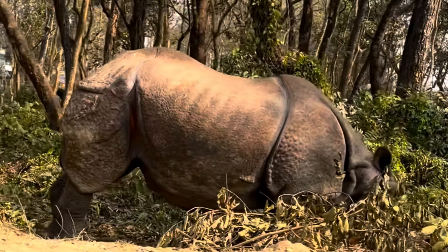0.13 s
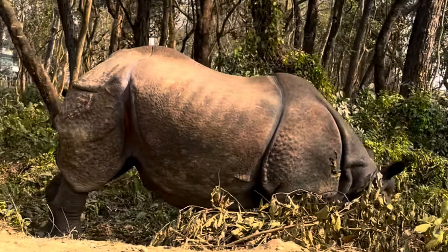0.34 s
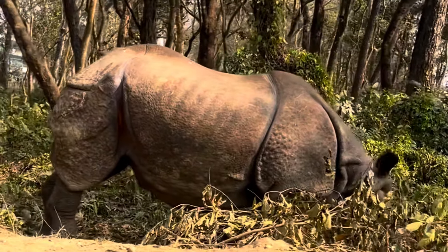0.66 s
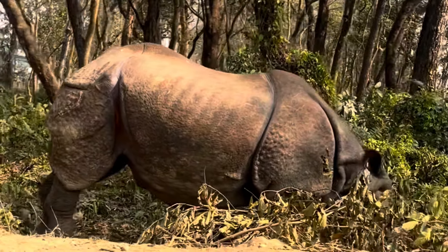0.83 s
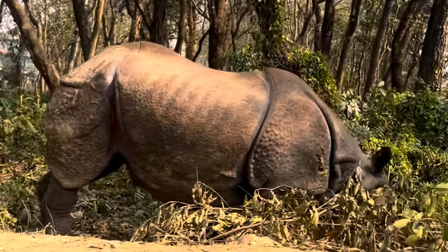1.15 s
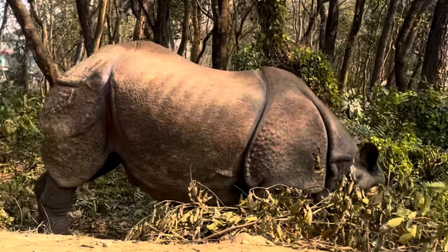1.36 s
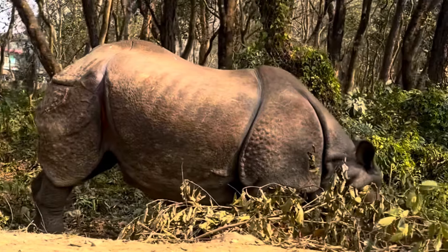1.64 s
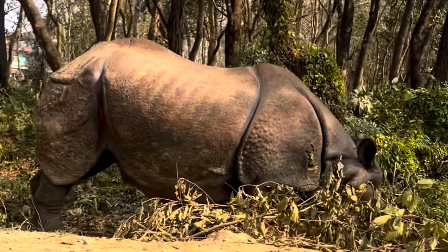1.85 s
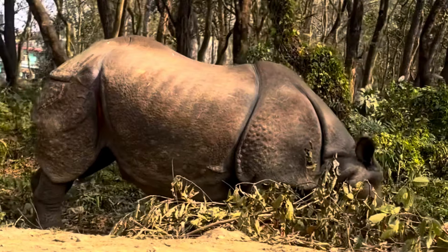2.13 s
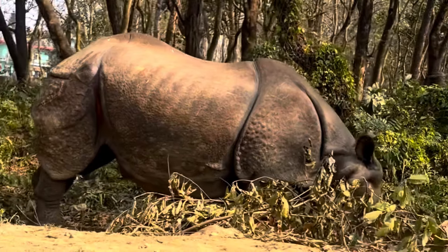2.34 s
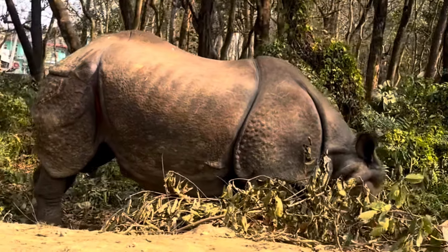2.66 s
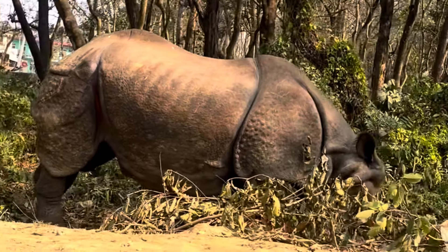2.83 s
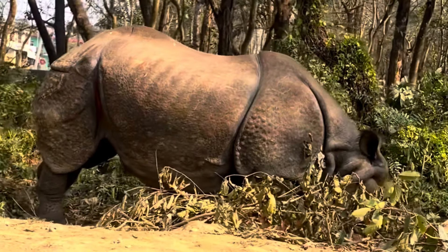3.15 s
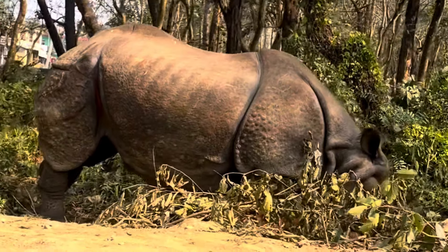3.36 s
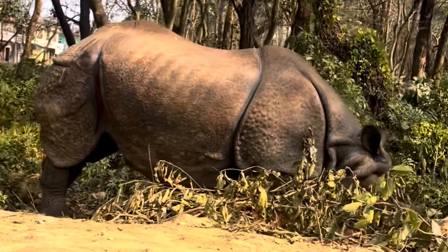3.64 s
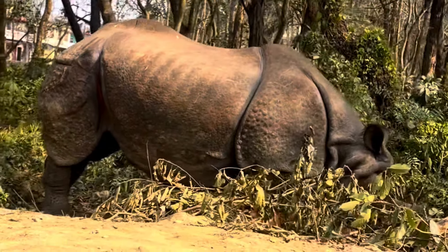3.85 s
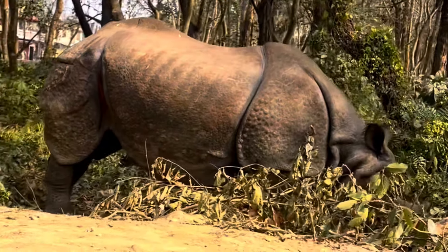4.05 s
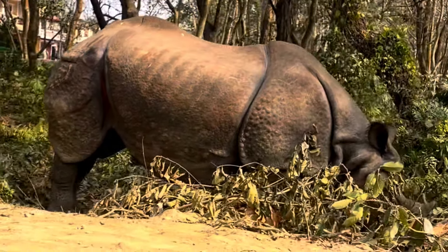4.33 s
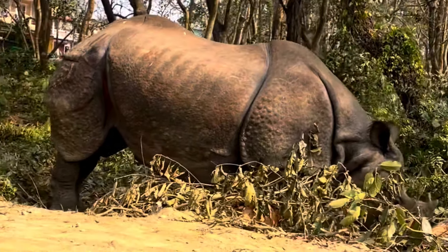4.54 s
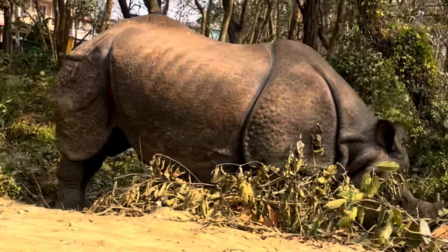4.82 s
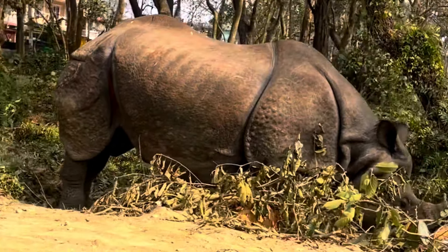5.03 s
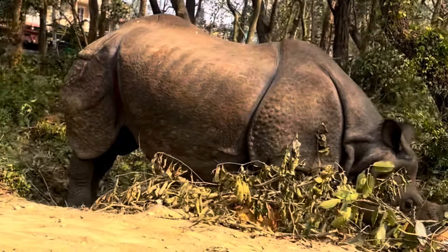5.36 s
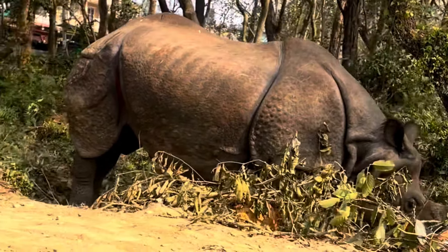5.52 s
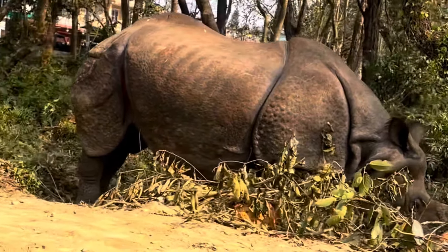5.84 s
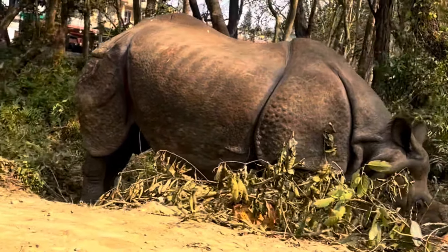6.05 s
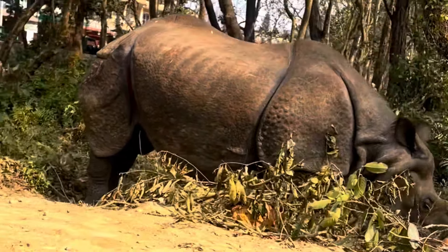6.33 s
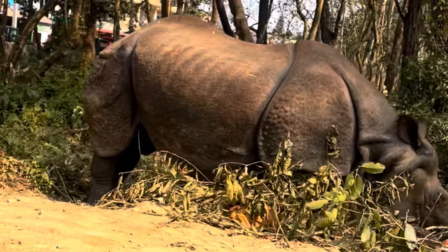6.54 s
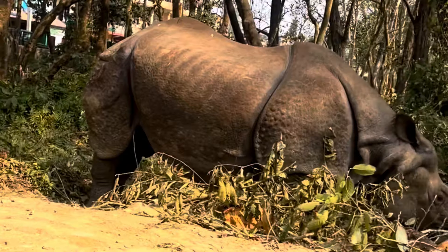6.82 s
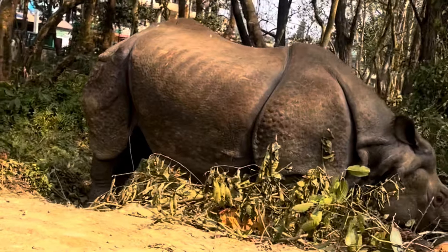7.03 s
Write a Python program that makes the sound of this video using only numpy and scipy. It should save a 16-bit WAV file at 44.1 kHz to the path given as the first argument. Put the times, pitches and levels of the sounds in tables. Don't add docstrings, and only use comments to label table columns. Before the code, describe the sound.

A steady, soft hiss of a far brook with small ringing gurgles runs throughout, above a deep rumble of slow air that swells slightly near 1.5 and 4.7 s. Soft dry twig cracks tick at 1.0 and 2.2 s. From 2.4 to 4 s a high bird behind leaves warbles, plunges in pitch and ends in a rough buzz, mostly echo; a short chatter cuts in at 2.7 s and cattle low very faintly far left at 2.8-3.6 s. From 4.7 s a distant piper holds notes, joined after 5.4 s by thin, very high shaking whistles and low fluting on the left. Twigs snap sharply at 5.2 and 5.8 s. At 6.35-7 s a near bird pours out loud, quick slurs and trills, with another crack left at 6.8 s, then a shrill left-hand bird shakes upward around 7 s. Wide stereo, woodland echoes, muted treble.

```python
import sys
import numpy as np
from scipy import signal
from scipy.fft import rfft, irfft
from scipy.io import wavfile
from scipy.ndimage import uniform_filter1d, map_coordinates

SR = 44100
rng = np.random.default_rng(int(sys.argv[2]) if len(sys.argv) > 2 else 0)


def voltage_ratio(decibels):
    exponent = np.asarray(decibels, float) / 20
    return 10 ** exponent


def store_wav(level_fs):
    pcm = np.round(np.clip(np.atleast_2d(level_fs), -1, 1) * 32767)
    wavfile.write(sys.argv[1], SR, pcm.T.astype(np.int16))


N = 316638


def unit(x):
    return x / np.sqrt(np.mean(x ** 2) + 1e-20)


def along(points, hz):
    f, v = np.transpose(points)
    return np.interp(np.log(hz + 1), np.log(f + 1), v)


def wobble(rate, count=N):
    return map_coordinates(rng.standard_normal(N // 100), [np.arange(count) * rate / SR])


def slur(u, length, bend=0.94):
    return u ** bend


def hook(settle_s):
    return lambda u, length: 1 - np.exp(-u * length / settle_s)


def arch(u, length):
    return np.sin(np.pi * u)


def phrase(rows, law, peak_at, rise_db, fall_db, depth_hz=0., grow_s=0.0091):
    u = np.linspace(0, 1, 41)
    swell = np.interp(u, [0, np.clip(peak_at, .05, .95), 1], [-rise_db, 0, -fall_db])
    notes = []
    for s, length, first, last, db in rows:
        hz = first + (last - first) * law(u, length)
        depth = depth_hz * (1 - np.exp(-u * length / grow_s))
        notes.append(np.transpose([s + u * length, hz, db + swell, depth]))
    return notes


def song(notes, warble_hz=48.3, rough_db=0.5, edge=0.003, dip_db=9.0):
    out = np.zeros(N + SR)
    for note in notes:
        s, hz, db, depth = np.transpose(note)
        t = np.arange(s[0], s[-1], 1 / SR)
        shake = np.sin(2 * np.pi * warble_hz * t + 0.874 * wobble(25, count=len(t)))
        wide = np.interp(t, s, depth)
        swing = wide * (shake + 0.28 * shake ** 2)
        phase = 2 * np.pi * np.cumsum(np.interp(t, s, hz) + swing) / SR
        to_edge = np.minimum(t - s[0], s[-1] - t)
        fade = np.sin(np.pi / 2 * np.clip(to_edge / edge, 0, 1)) ** 2
        rough = rough_db * wobble(74, count=len(t))
        dip = dip_db * shake ** 2 * np.tanh(wide / 120)
        level = voltage_ratio(np.interp(t, s, db) + rough - dip)
        out[round(s[0] * SR):][:len(t)] += np.sqrt(2) * level * fade * np.sin(phase)
    return out[:N]


def placed(x, pan_db, lag, direct_db, echo_db, decay=1., near_db=4.0):
    # (frequency [Hz], time to fall 60 dB [s])
    wood = [(200, 0.15), (3500, 1.03), (7000, 0.87), (10000, 0.52)]
    build_s = 0.027
    hz, t, z = signal.stft(rng.standard_normal((2, SR * 3 // 2)), SR, nperseg=256)
    fall = voltage_ratio(-60 * t / decay / along(wood, hz)[:, None])
    far = signal.istft(z * (1 - np.exp(-t / build_s)) * fall, SR, nperseg=256)[1]
    near = rng.standard_normal(far.shape) * voltage_ratio(-60 * np.arange(far.shape[1]) / SR / .12)
    trunks = voltage_ratio(echo_db) * far / np.linalg.norm(far[0])
    branches = voltage_ratio(near_db) * near / np.linalg.norm(near[0])
    direct = np.array([np.roll(x, round(lag / 2)), np.roll(x, -round(lag / 2))])
    start = np.flatnonzero(x)[0]
    wet = signal.oaconvolve(x[None, start:], trunks + branches, axes=1)
    wet = np.pad(wet, [(0, 0), (start, 0)])[:, :N]
    return (voltage_ratio(direct_db) * direct + wet) * voltage_ratio([[pan_db / 2], [-pan_db / 2]])


def near_singer():
    # (start [s], length [s], first pitch [Hz], last pitch [Hz], peak [dB])
    quick = [(6.352, 0.02, 4840, 4230, -39.5), (6.374, 0.022, 4120, 3820, -43),
             (6.385, 0.021, 4950, 4770, -44.5), (6.401, 0.023, 4120, 3740, -35),
             (6.42, 0.013, 3800, 2940, -43.5), (6.443, 0.031, 4020, 4030, -52),
             (6.445, .035, 2550, 2500, -53), (6.465, .04, 2916, 3080, -51), (6.469, .02, 4050, 4050, -48),
             (6.482, 0.031, 3300, 4026, -31), (6.521, 0.017, 5050, 4250, -41.5),
             (6.532, 0.021, 4217, 3584, -32.5), (6.535, 0.02, 3040, 3000, -50.5),
             (6.59, .04, 3020, 3050, -57), (6.611, 0.012, 4190, 4010, -39), (6.621, .018, 4004, 3724, -32),
             (6.636, .016, 3600, 3430, -42), (6.676, 0.011, 4170, 3950, -44),
             (6.715, 0.033, 4270, 4180, -44.5), (6.74, 0.041, 3530, 3030, -46),
             (6.825, 0.064, 4040, 4260, -48.5), (6.862, .05, 2600, 3390, -51),
             (6.925, 0.018, 4180, 4440, -61), (6.93, 0.041, 3250, 2620, -50.5)]
    trill = [
        (6.662, 0.046, 4870, 4840, -45.5),
        (6.755, .032, 4800, 4920, -51),
        (6.805, 0.044, 4570, 4390, -43.5),
        (6.94, 0.067, 3470, 3480, -49.5),
    ]
    notes = (phrase(quick, slur, peak_at=.55, rise_db=10, fall_db=17)
             + phrase(trill, slur, peak_at=.15, rise_db=4, fall_db=8, depth_hz=119))
    return placed(song(notes), pan_db=2.5, lag=-45.0, direct_db=0.5, near_db=-12, echo_db=-3.5, decay=1.06)


def seeter():
    # (start [s], length [s], first pitch [Hz], last pitch [Hz], peak [dB])
    high = [
        (2.37, 0.044, 8020, 9000, -57),
        (2.405, 0.053, 8170, 7900, -50.5),
        (2.445, 0.047, 7750, 7150, -47),
        (2.49, 0.08, 7330, 6900, -52),
        (2.53, 0.032, 8250, 8150, -65),
        (2.89, 0.072, 8520, 8200, -58),
        (2.95, .1, 7425, 7150, -48.5),
        (3.04, 0.11, 6380, 6300, -55),
        (3.11, 0.19, 6930, 6900, -52.5),
    ]
    plunge = [
        (3.315, .066, 6720, 3500, -49),
    ]
    landing = [
        (3.378, .155, 3884, 4060, -47.5),
        (3.85, .19, 3480, 3415, -59.5),
    ]
    buzz = [
        (3.53, .33, 3954, 3853, -45.5),
    ]
    notes = (phrase(high, slur, peak_at=0.23, rise_db=1.5, fall_db=5, depth_hz=209)
             + phrase(plunge, lambda u, length: slur(u, length, bend=1.6),
                      peak_at=0.43, rise_db=0.5, fall_db=-8.0, depth_hz=135)
             + phrase(landing, slur, peak_at=0.12, rise_db=-1.0, fall_db=5, depth_hz=276))
    rasp = phrase(buzz, slur, peak_at=0.38, rise_db=2.0, fall_db=7, depth_hz=802, grow_s=0.0145)
    voice = song(notes, warble_hz=36.5, dip_db=12.5) + song(rasp, warble_hz=32.9, rough_db=5.5, dip_db=16)
    return placed(voice, pan_db=-3.5, lag=8, direct_db=-5, near_db=2.5, echo_db=1.0, decay=0.88)


def chatterer():
    # (start [s], length [s], first pitch [Hz], last pitch [Hz], peak [dB])
    chatter = [
        (2.722, 0.021, 4360, 4470, -62),
        (2.745, 0.024, 4040, 3940, -50.5),
        (2.755, 0.017, 5080, 5080, -53.5),
        (2.772, 0.022, 4380, 3860, -51),
        (2.792, 0.013, 3650, 3280, -50),
        (2.81, 0.021, 4100, 4120, -59),
    ]
    notes = phrase(chatter, slur, peak_at=0.33, rise_db=7.0, fall_db=8)
    return placed(song(notes), pan_db=-4.5, lag=8, direct_db=-0.5, near_db=4, echo_db=0.5, decay=1.1)


def shriller():
    # (start [s], length [s], first pitch [Hz], last pitch [Hz], peak [dB])
    shrill = [
        (6.978, 0.09, 5780, 7260, -49.5),
    ]
    ending = [
        (7.14, 0.037, 5680, 6434, -49),
    ]
    snap = hook(settle_s=.005)
    notes = (phrase(shrill, snap, peak_at=.4, rise_db=-0.5, fall_db=2.5, depth_hz=420, grow_s=0.018)
             + phrase(ending, snap, peak_at=0.44, rise_db=5, fall_db=-3.5))
    voice = song(notes, warble_hz=68.5, dip_db=-1.5)
    return placed(voice, pan_db=5, lag=-45, direct_db=1, echo_db=-1.2, decay=0.97)


def fluter():
    # (start [s], length [s], first pitch [Hz], top pitch [Hz], peak [dB])
    arched = [
        (5.778, .039, 2330, 2353, -59),
        (5.865, 0.047, 2330, 2492, -54),
        (6.0, 0.064, 2230, 2270, -62.5),
        (7.128, 0.051, 2650, 2710, -54.5),
    ]
    crest = [
        (6.195, .08, 2670, 3018, -51),
    ]
    lead = [
        (6.105, .092, 2310, 2700, -58.5),
        (6.29, 0.11, 3150, 3070, -65),
    ]
    notes = (phrase(arched, arch, peak_at=.55, rise_db=5.5, fall_db=5)
             + phrase(crest, arch, peak_at=0.79, rise_db=2.5, fall_db=-1.0)
             + phrase(lead, lambda u, length: slur(u, length, bend=1.1),
                      peak_at=0.71, rise_db=4, fall_db=-1.0))
    return placed(song(notes), pan_db=10.5, lag=-42, direct_db=1.0, near_db=-7, echo_db=-7, decay=.9)


def piper():
    # (start [s], length [s], first pitch [Hz], last pitch [Hz], peak [dB])
    hooked = [
        (5.387, 0.13, 5950, 5120, -60),
        (6.073, .127, 6100, 5200, -59.5),
    ]
    held = [
        (4.722, 0.25, 3545, 3415, -57.5),
        (5.04, 0.14, 4450, 4430, -61.5),
        (5.74, 0.13, 4430, 4420, -59),
    ]
    quick = [
        (4.698, 0.034, 2800, 3610, -60.5),
        (5.19, .05, 3900, 4400, -69.5),
        (5.425, 0.015, 5050, 4840, -59),
        (5.445, .032, 4150, 3720, -60),
        (5.855, 0.021, 4850, 4630, -61),
        (6.118, 0.021, 5200, 3590, -52.5),
        (6.146, 0.02, 3640, 3670, -58.5),
    ]
    notes = (phrase(hooked, hook(settle_s=.007), peak_at=0.067, rise_db=1.5, fall_db=10, depth_hz=45)
             + phrase(held, slur, peak_at=.15, rise_db=1.5, fall_db=12, depth_hz=48.3)
             + phrase(quick, slur, peak_at=0.46, rise_db=3.0, fall_db=-1.5))
    voice = song(notes, rough_db=3.5, dip_db=8, warble_hz=26.7)
    return placed(voice, pan_db=5, lag=-39, direct_db=-5.0, near_db=2.5, echo_db=-4.5, decay=1.0)


def thin_singer():
    # (start [s], length [s], first pitch [Hz], last pitch [Hz], peak [dB])
    opening = [
        (5.39, 0.16, 9000, 8520, -62),
    ]
    long_notes = [
        (5.59, 0.25, 8610, 8430, -63.5),
        (5.76, 0.19, 8600, 8290, -62),
        (5.94, .17, 8430, 8390, -63),
        (6.138, 0.21, 8270, 8420, -54.5),
    ]
    notes = (phrase(opening, hook(settle_s=0.013), peak_at=0.34, rise_db=7, fall_db=5, depth_hz=70)
             + phrase(long_notes, slur, peak_at=0.18, rise_db=2, fall_db=9.5, depth_hz=195, grow_s=0.027))
    voice = song(notes, warble_hz=36.9, rough_db=4.0, dip_db=-1.5)
    return placed(voice, pan_db=4.5, lag=-8.5, direct_db=-4, echo_db=-1.0, decay=0.97)


def birds():
    return near_singer() + seeter() + chatterer() + shriller() + fluter() + piper() + thin_singer()


def lowing():
    # (start [s], length [s], first pitch [Hz], last pitch [Hz], peak [dB])
    calls = [
        (2.8, 0.79, 162.4, 173.4, -62),
        (6.2, 0.21, 210, 192, -68),
    ]
    t, out = np.arange(N) / SR, 0
    for call in phrase(calls, slur, peak_at=0.35, rise_db=15.5, fall_db=17.5):
        s, hz, db, _ = np.transpose(call)
        phase = 2 * np.pi * np.cumsum(np.interp(t, s, hz)) / SR
        level = uniform_filter1d(voltage_ratio(np.interp(t, s, db, left=-140, right=-140)), size=2000)
        out = out + level * (np.sin(phase) + voltage_ratio(-14.5) * np.sin(2 * phase))
    return out * voltage_ratio([[8], [-7]])


def twigs():
    # (time [s], peak [dB], left over right [dB])
    cracks = [
        (1.037, -55, 2),
        (2.1824, -53, 3),
        (4.8658, -65, -1.0),
        (5.2093, -41, -2),
        (5.7894, -36, -4),
        (6.6294, -69, 1),
        (6.79, -48, 9),
    ]
    out, t = np.zeros((2, N)), np.arange(600) / SR
    for s, db, pan_db in cracks:
        crack = np.diff(rng.standard_normal(len(t) + 1)) * voltage_ratio(db - 15 - 60 * t / 0.013)
        out[:, round(s * SR):][:, :len(t)] += crack * voltage_ratio([[pan_db / 2], [-pan_db / 2]])
    return out


def rush(spectrum, patchy_db):
    # (frequency [Hz], left-right correlation [-1 to 1])
    alike = [(60, 0.91), (120, 0.51), (260, 0.3), (540, -0.068), (1130, -0.22), (2350, 0.013),
             (4890, -0.094), (10200, 0.11)]
    z = signal.stft(rng.standard_normal((2, N + 4096)), nperseg=512)[2]
    field = uniform_filter1d(rng.standard_normal(z.shape[1:]), size=5, axis=0)
    field = uniform_filter1d(field, size=6, axis=1)
    pair = signal.istft(z * voltage_ratio(patchy_db * unit(field)), nperseg=512)[1]
    hz = np.fft.rfftfreq(pair.shape[1], 1 / SR)
    turn = np.arccos(np.clip(along(alike, hz), -1, 1)) / 2
    shaped = rfft(pair) * voltage_ratio(along(spectrum, hz))
    mid, side = irfft(shaped * [np.cos(turn), np.sin(turn)])[:, :N]
    return unit(np.array([mid + side, mid - side]))


def bubbles(s, db, hz, pan_db, cycles, phase):
    t = np.arange(2600) / SR
    u = t * (hz / cycles)[:, None]
    tone = np.sin(2 * np.pi * hz[:, None] * t * (1 + .02 * u))
    ring = voltage_ratio(db)[:, None] * u * np.exp(1 - u) * tone
    at = (np.round(s * SR).astype(int)[:, None] + np.arange(len(t))).ravel()

    def side(gain):
        return np.bincount(at, (gain[:, None] * ring).ravel(), N + len(t))[:N]

    return np.array([side(voltage_ratio(pan_db / 2)), side(phase * voltage_ratio(-pan_db / 2))])


def brook():
    # (frequency [Hz], level per Hz [dB])
    water = [(53, -29), (90, -12.5), (157, -7), (188, -5.5), (323, -6.5), (357, -6), (419, -3), (747, -2.5),
             (1090, -2), (1500, -8), (3540, -8), (4330, -10), (5840, -15), (10600, -27), (13800, -63),
             (22000, -120)]
    # (time [s], peak [dB], pitch [Hz], left over right [dB])
    gurgle = [(0.307, -37.5, 845, -9), (0.859, -41, 610, 4), (1.201, -34.5, 1030, -1), (1.264, -41, 946, 0),
              (1.339, -39.5, 705, 1), (1.736, -41, 572, 1), (1.833, -34, 1010, -4), (2.879, -44, 664, 2),
              (3.03, -37.5, 578, 0), (3.116, -39, 830, -5), (3.194, -37, 1260, -12), (3.805, -38, 1006, 4),
              (3.869, -42, 1140, 5), (4.305, -47, 703, 12), (4.363, -42.5, 1266, -9),
              (4.562, -38.5, 533, 2), (4.832, -38, 542, 5), (5.031, -38, 806, 4), (5.715, -38, 1037, -10),
              (5.774, -39.5, 830, 8), (6.007, -37, 844, -9), (6.631, -36.5, 1140, -7)]
    hiss = voltage_ratio(-53.5 + 0.39 * wobble(6)) * rush(water, patchy_db=1.58)
    when, size = rng.uniform(size=(900, 2)).T
    pitch, pan = rng.standard_normal((900, 2)).T
    bed = bubbles(when * N / SR, -67 + 8 * size, 800 * np.exp(.4 * pitch), 5 * pan, 3.5, phase=np.sign(pan))
    s, db, hz, pan_db = np.transpose(gurgle)
    return hiss + bed + bubbles(s, db - 14.5, hz, pan_db, 5, phase=0.71)


def breeze():
    # (frequency [Hz], level per Hz [dB])
    rumble = [(1.8, -14.5), (3.0, 6), (19, -5), (130, -28.5), (170, -61.5), (290, -120)]
    # (time [s], level [dB])
    pressure = [
        (0, -49.5),
        (1.5, -46),
        (2.1, -49.5),
        (4.7, -47),
        (5.9, -48.5),
        (6.4, -47.5),
        (7.18, -52.5),
    ]
    s, air_db = np.transpose(pressure)
    level = np.interp(np.arange(N) / SR, s, air_db) + 0.4 * wobble(8.1)
    return voltage_ratio(level) * rush(rumble, patchy_db=-0.9)


def masked(x, under_db, up_db, down_db, chance_db):
    # (frequency [Hz], shortage a band survives [standard deviations])
    spare = [(5000, 4), (7000, 2.3), (8400, 1.1), (9200, -.8), (10000, -.6), (10600, -1.5)]
    z = signal.stft(x, nperseg=2048)[2]
    bands = z[:, :1024].reshape(len(x), 64, 16, -1)
    level = 10 * np.log10(np.mean(np.abs(bands) ** 2, axis=(0, 2)) + 1e-20)
    octave = np.log2(np.arange(64) + .5)
    away = np.subtract.outer(octave, octave)
    reach = level[None] - np.where(away > 0, up_db * away, -down_db * away)[..., None]
    shortage = unit(uniform_filter1d(rng.standard_normal(level.shape), size=3, axis=0))
    shortage = shortage + unit(uniform_filter1d(rng.standard_normal(level.shape[1]), size=2))
    hidden = level < reach.max(axis=1) - under_db + chance_db * shortage
    faint = level < np.median(level, axis=1)[:, None] + 6
    hidden |= faint & (shortage > along(spare, (np.arange(64) + .5) * SR / 128)[:, None])
    hidden[:8] = False
    z[:, :1024] = (bands * ~hidden[None, :, None]).reshape(len(x), 1024, -1)
    return signal.istft(z, nperseg=2048)[1][:, :N]


def scene():
    return birds() + lowing() + twigs() + brook() + breeze()


def band_limit(x):
    return signal.sosfilt(signal.butter(12, 10770, fs=SR, output="sos"), x)


def record(dry):
    mix = masked(dry, under_db=15.5, up_db=32.5, down_db=58, chance_db=1.54)
    return band_limit(mix)


dry = scene()
out = record(dry)
store_wav(out)
```